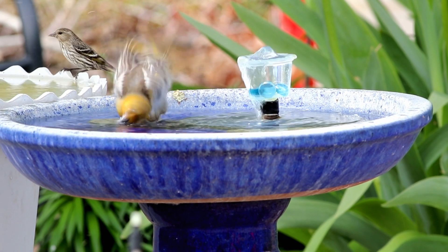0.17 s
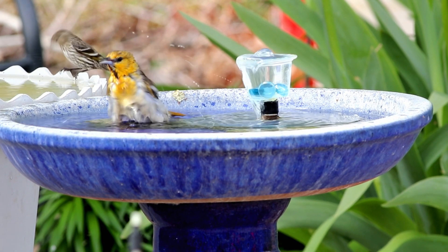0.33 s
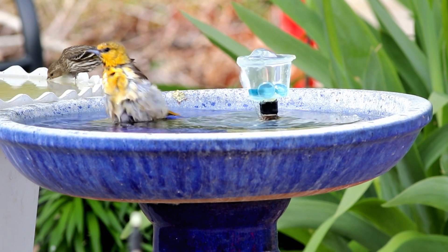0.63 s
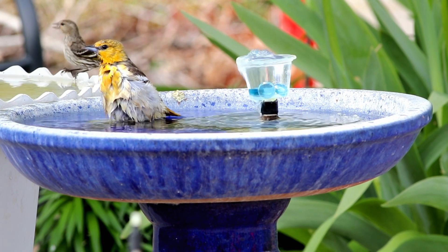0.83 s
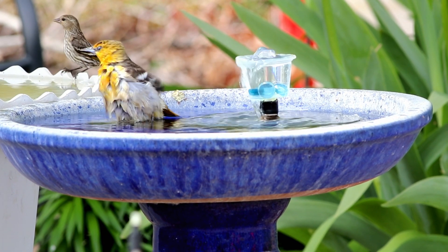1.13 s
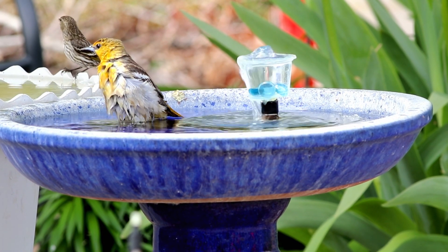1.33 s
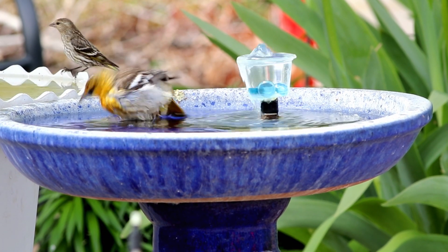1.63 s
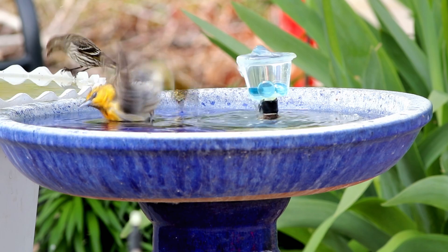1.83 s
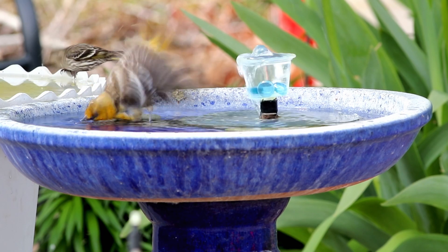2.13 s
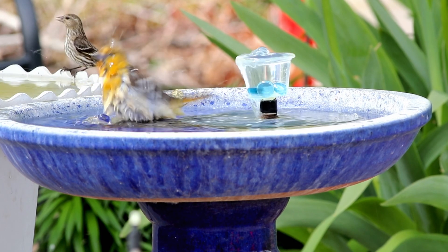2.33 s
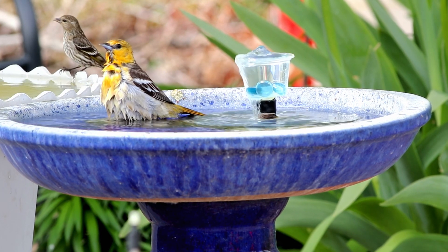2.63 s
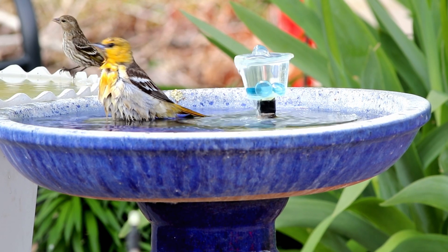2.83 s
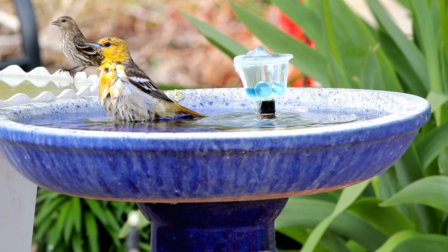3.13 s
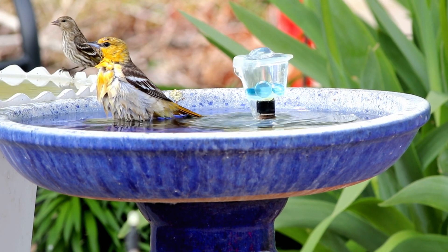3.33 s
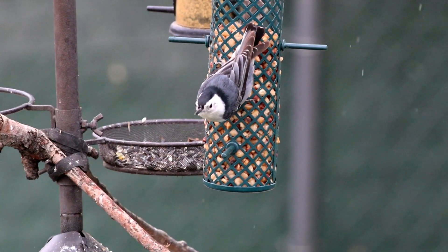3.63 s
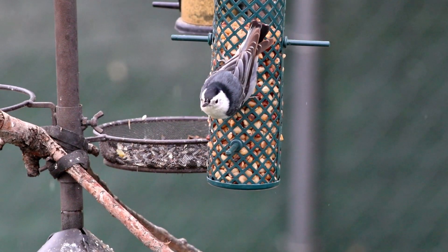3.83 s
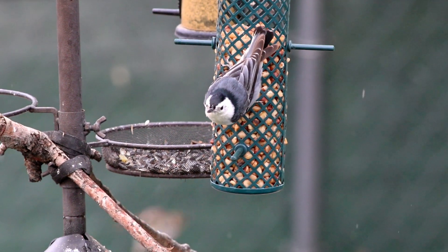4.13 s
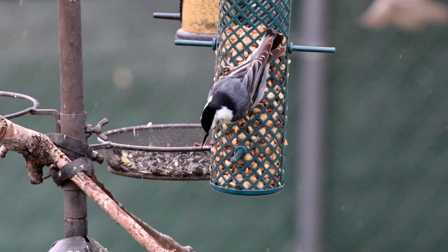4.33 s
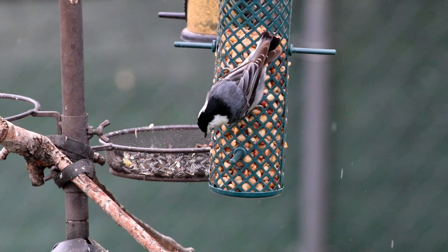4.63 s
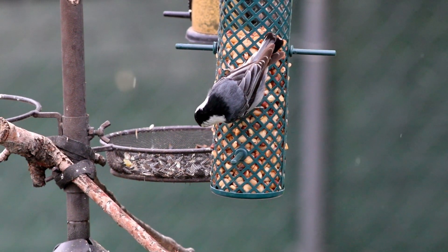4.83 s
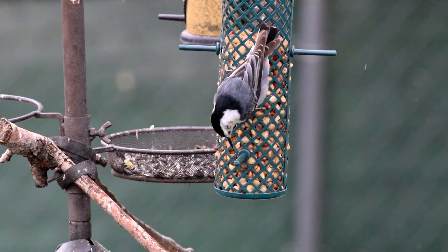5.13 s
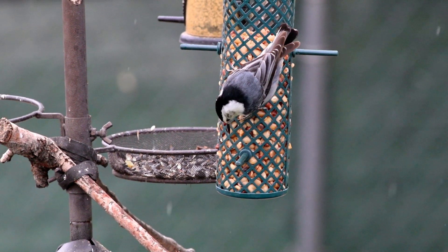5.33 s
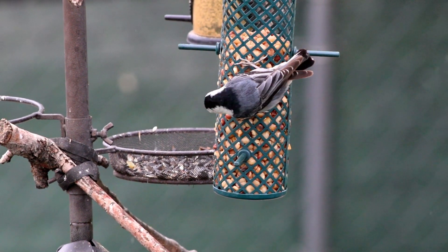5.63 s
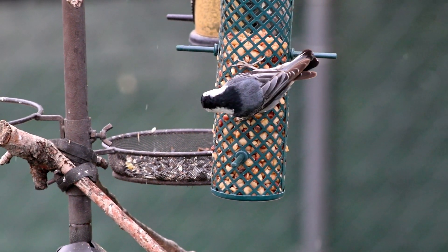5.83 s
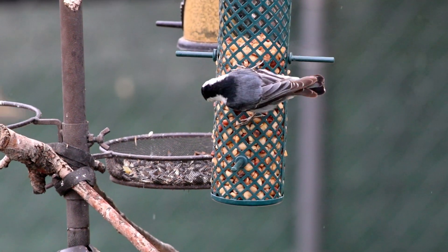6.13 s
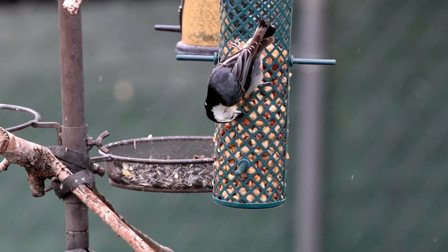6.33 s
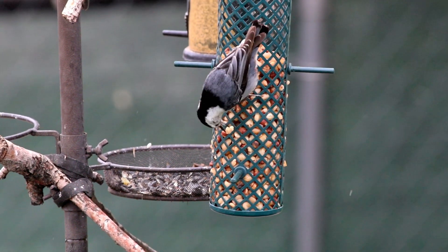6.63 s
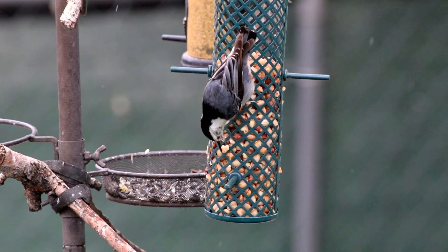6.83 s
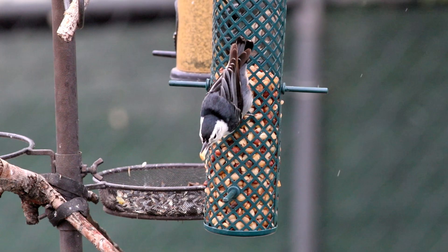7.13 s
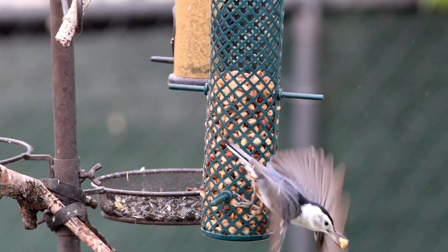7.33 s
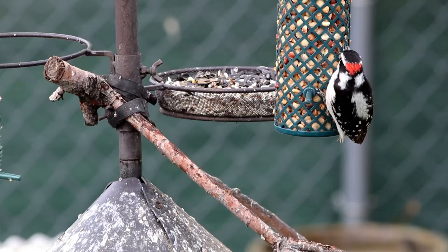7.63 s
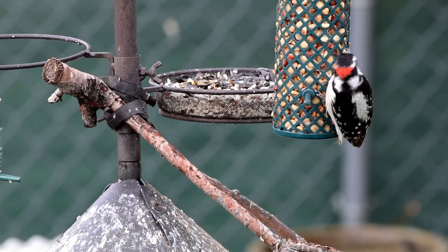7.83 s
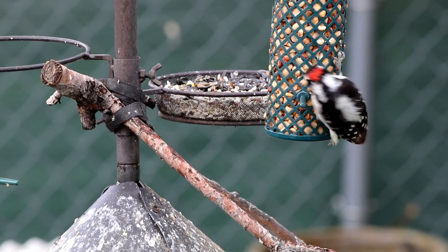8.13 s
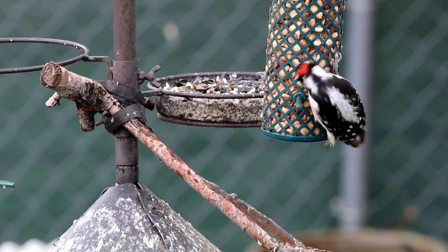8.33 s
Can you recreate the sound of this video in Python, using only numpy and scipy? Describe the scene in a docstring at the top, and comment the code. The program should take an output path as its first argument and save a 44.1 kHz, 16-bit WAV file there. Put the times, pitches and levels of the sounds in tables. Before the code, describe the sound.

Bright overlapping bird chirps and fast trills fill a garden, with faint murmur, dull knocks and low wind thumps at the microphone.

```python
"""A backyard in which a flock of small songbirds twitters, heard through one microphone.
Near birds whistle gliding sines, buzz in pulsed trills, scold and tap in filtered noise; echoes blur the notes.
The far flock sums many random glides; murmur, leaf hiss and wind rumble are coloured noise below it.
Wind bumps the microphone as low tone pulses, and the sound drops out twice for a moment."""
import sys
import numpy as np
from scipy import signal
from scipy.fft import rfft, irfft
from scipy.io import wavfile
from scipy.ndimage import uniform_filter1d

SR = 44100
rng = np.random.default_rng(int(sys.argv[2]) if len(sys.argv) > 2 else 0)


def bounce(signal):
    """Save signal as a 16-bit WAV file at the path given by the first command-line argument."""
    frames = np.transpose(np.atleast_2d(signal))
    limited = np.clip(frames, -1, 1)
    pcm = np.round(limited * 32767).astype(np.int16)
    wavfile.write(sys.argv[1], SR, pcm)


N = 373527


def from_db(db):
    """Level definition: decibels to amplitude gain."""
    return 10 ** (np.asarray(db) / 20)


def rms_one(x):
    """Power normalisation: scales a signal to rms 1."""
    return x / np.sqrt(np.mean(x ** 2) + 1e-20)


def in_time(rows):
    """Linear interpolation: table columns become curves over all samples."""
    seconds, *columns = np.transpose(rows)
    return [np.interp(np.arange(N) / SR, seconds, column) for column in columns]


def coloured(x, points):
    """Spectral shaping: (Hz, dB) points joined over log frequency, -90 dB beyond the ends."""
    hz = np.maximum(np.fft.rfftfreq(N, 1 / SR), 1)
    point_hz, point_db = np.transpose(points)
    shape_db = np.interp(np.log(hz), np.log(point_hz), point_db, -90, -90)
    return irfft(rfft(x) * from_db(shape_db), N)


def drift(rate):
    """Slow random modulation: Gaussian knots, rate per second, joined by lines."""
    knots = rng.standard_normal(1000)
    return np.interp(np.arange(N) / SR * rate, np.arange(len(knots)), knots)


def swells(rows, rise, fall, rest_db):
    """Power addition: rows rise and die away, 20 dB per rise or fall time, over a resting level in dB."""
    t = np.arange(N) / SR
    power = from_db(rest_db) ** 2
    for start, length, level_db in rows:
        outside = np.maximum((start - t) / rise, (t - start - length) / fall)
        power = power + from_db(level_db - 20 * np.maximum(outside, 0)) ** 2
    return 10 * np.log10(power)


NOTE_RISE_S, NOTE_FALL_S = 0.0053, 0.013


def whistle(notes, waver, overtone_db, flutter_hz, rise=NOTE_RISE_S):
    """Frequency modulation: sines glide on parabolas through three pitches, unsteady, with a weak octave."""
    one_pole = [1, -np.exp(-2 * np.pi * flutter_hz / SR)]
    shake = rms_one(signal.lfilter([1], one_pole, rng.standard_normal(N + SR)))
    out = np.zeros(N + SR)
    for start_s, length, start, middle, end, level_db in notes:
        at = max(round(start_s * SR), 0)
        u = np.linspace(-1, 1, round(length * SR))      # -1 at the onset, 1 at the end
        hz = middle + (end - start) / 2 * u + ((start + end) / 2 - middle) * u * u
        rough = waver * min(middle / 4000, 1)      # low whistles are purer
        phase = 2 * np.pi * np.cumsum(hz * (1 + rough * shake[at:at + len(u)])) / SR
        # quick onset, slower end
        swell = np.clip(length / 2 * np.minimum((1 + u) / rise, (1 - u) / NOTE_FALL_S), 0, 1)
        tone = np.sin(phase) + from_db(overtone_db) * np.sin(2 * phase)
        out[at:at + len(u)] += from_db(level_db) * swell * tone
    return out[:N]


def yard(x, scatter_db, t60):
    """Diffuse reverberation: leaves, fences and walls scatter a dying cloud of echoes behind the sound."""
    t = np.arange(SR // 2) / SR
    cloud = rng.standard_normal(len(t)) * from_db(-60 * t / t60)
    cloud = from_db(scatter_db) * cloud / np.sqrt(np.sum(cloud ** 2))
    return x + signal.fftconvolve(x, cloud)[:N]


# Near whistled notes. Each row: start in seconds, length in seconds, start, middle and end pitch in Hz,
# level of the direct sine in dB.
NEAR_NOTES = [(0.001, 0.045, 4290, 4040, 4100, -44), (0.154, 0.053, 3920, 3890, 4100, -46.5),
              (0.174, 0.025, 6430, 6420, 6500, -43), (0.22, 0.029, 4780, 4700, 4640, -41.5),
              (0.244, 0.076, 4000, 3945, 4210, -44), (0.376, 0.045, 1840, 1710, 1600, -51.5),
              (0.382, 0.04, 4500, 4470, 4500, -44.5), (0.398, 0.042, 5260, 4860, 4760, -43),
              (0.455, 0.037, 3160, 3240, 3250, -56), (0.49, 0.068, 3870, 4010, 3760, -47.5),
              (0.745, 0.034, 2870, 2840, 2800, -53), (0.631, 0.019, 2550, 2587, 2650, -41),
              (0.789, 0.04, 4250, 4090, 3780, -42.5), (0.803, 0.031, 2500, 2450, 2470, -54),
              (0.805, 0.071, 5500, 5080, 4520, -47.5), (0.833, 0.047, 2940, 3134, 2910, -44),
              (0.899, 0.048, 4770, 4320, 3700, -42), (0.962, 0.046, 3770, 3740, 3750, -44.5),
              (1.03, 0.029, 3300, 3200, 3180, -45.5), (1.036, 0.1, 4070, 3696, 4070, -47.5),
              (1.076, 0.051, 4530, 4420, 4390, -43), (1.126, 0.033, 2160, 1750, 1620, -47),
              (1.197, 0.061, 6390, 6100, 5460, -44), (1.2, 0.052, 5200, 4960, 4950, -46),
              (1.235, 0.055, 1630, 1920, 2240, -58), (1.278, 0.032, 2240, 2414, 2500, -37.5),
              (1.325, 0.074, 6770, 6250, 6040, -48), (1.33, 0.08, 5350, 5100, 5000, -49),
              (1.335, 0.056, 3850, 4090, 4470, -46.5), (1.447, 0.073, 3550, 3890, 3870, -45),
              (1.468, 0.055, 6800, 6350, 6050, -47), (1.483, 0.022, 5400, 5510, 5640, -39),
              (1.485, 0.093, 2700, 3060, 3260, -50.5), (1.531, 0.034, 2570, 2620, 2620, -48.5),
              (1.597, 0.085, 2900, 2860, 2660, -49.5), (1.603, 0.068, 4430, 4560, 4550, -42.5),
              (1.611, 0.099, 5790, 5740, 6020, -48), (1.643, 0.11, 4170, 3800, 3780, -42.5),
              (1.681, 0.065, 4390, 4220, 4350, -44.5), (1.693, 0.079, 6770, 5900, 5530, -45),
              (1.745, 0.055, 6310, 6600, 6540, -47), (1.86, 0.049, 5470, 5580, 5700, -45.5),
              (1.73, 0.046, 2530, 2610, 2770, -56), (1.962, 0.065, 7600, 7370, 7470, -42),
              (1.984, 0.072, 7860, 7930, 7900, -47.5), (1.986, 0.052, 4550, 4450, 4600, -51),
              (2.002, 0.037, 5450, 5370, 5250, -44), (2.016, 0.028, 4080, 4190, 4140, -39),
              (2.064, 0.066, 4170, 3870, 4200, -41), (2.086, 0.057, 5140, 4960, 4940, -40),
              (2.175, 0.037, 4330, 4460, 4630, -54.5), (2.398, 0.028, 6600, 6220, 6300, -42),
              (2.397, 0.029, 7280, 7350, 7160, -44.5), (2.405, 0.026, 7230, 8040, 9500, -46),
              (2.405, 0.056, 3710, 4630, 4340, -37.5), (2.431, 0.1, 5080, 5600, 5510, -48.0),
              (2.475, 0.068, 4370, 4760, 4750, -43.5), (2.509, 0.061, 3590, 3800, 3930, -51),
              (2.527, 0.037, 3070, 3120, 3310, -53), (2.8, 0.21, 4830, 4910, 4820, -60.5),
              (3.004, 0.046, 4000, 4130, 3530, -42.5), (3.04, 0.039, 8200, 7500, 6960, -51),
              (3.086, 0.035, 5310, 5340, 5180, -47.5), (3.106, 0.035, 5000, 4460, 4230, -41.5),
              (3.232, 0.052, 4950, 4240, 3530, -41.5), (3.315, 0.029, 5100, 5560, 5900, -43),
              (3.33, 0.051, 5000, 4390, 3860, -47), (3.435, 0.026, 7200, 7300, 7300, -51.5),
              (3.437, 0.043, 4610, 4440, 4340, -44.5), (3.521, 0.025, 6040, 5680, 5600, -43.5),
              (3.604, 0.063, 6440, 6000, 6150, -51), (3.542, 0.046, 4960, 4730, 4300, -52.5),
              (3.652, 0.047, 6260, 6100, 6060, -52), (3.72, 0.061, 5220, 5020, 5040, -54),
              (3.89, 0.035, 5770, 5740, 5600, -44), (3.94, 0.069, 5170, 4560, 3820, -47),
              (4.25, 0.069, 3970, 3970, 4170, -53.5), (4.53, 0.033, 4100, 4640, 5260, -48),
              (4.685, 0.044, 4810, 4080, 3450, -45.5), (4.724, 0.078, 7000, 6670, 6200, -54),
              (4.75, 0.095, 4390, 3540, 3340, -53.5), (4.888, 0.053, 3970, 4600, 4700, -47.5),
              (4.985, 0.065, 6080, 6270, 6250, -48), (4.998, 0.034, 5000, 4420, 3880, -39.5),
              (5.115, 0.038, 4780, 3940, 3480, -42.5), (5.125, 0.04, 2850, 3140, 3270, -42.5),
              (5.18, 0.062, 2430, 2620, 3250, -56.5), (5.185, 0.033, 4080, 3660, 3600, -46),
              (5.287, 0.031, 4020, 4400, 4360, -49), (5.42, 0.055, 5020, 4290, 3960, -43.0),
              (5.426, 0.15, 2510, 2270, 1980, -53.5), (5.452, 0.037, 6500, 5370, 4760, -43.5),
              (5.514, 0.037, 5500, 5640, 5050, -43.5), (5.54, 0.074, 4770, 3970, 3780, -45),
              (5.565, 0.12, 2180, 2985, 2780, -58), (5.678, 0.02, 4140, 4110, 3960, -42),
              (5.779, 0.045, 6830, 5600, 5300, -50.5), (5.855, 0.03, 5900, 5820, 5830, -42.5),
              (5.87, 0.049, 5700, 4310, 3450, -46.5), (5.999, 0.035, 5660, 5540, 5650, -51),
              (6.003, 0.016, 11500, 9500, 7000, -51), (6.061, 0.046, 6150, 6280, 6260, -48),
              (6.071, 0.047, 6730, 7270, 7200, -54), (6.107, 0.079, 4640, 4340, 3720, -45),
              (6.13, 0.037, 10600, 10570, 11100, -59), (6.163, 0.024, 8040, 7870, 7500, -49),
              (6.183, 0.099, 3730, 4340, 3920, -43.5), (6.191, 0.041, 5660, 5480, 5470, -50),
              (6.207, 0.028, 8000, 7960, 7700, -46), (6.207, 0.034, 7200, 7400, 7260, -49),
              (6.378, 0.068, 4400, 4430, 4560, -45), (6.426, 0.067, 3760, 3940, 4210, -40.5),
              (6.468, 0.048, 5120, 5240, 5000, -42.5), (6.504, 0.033, 5740, 5850, 6100, -43),
              (6.614, 0.024, 5770, 5950, 5830, -44), (6.616, 0.032, 5400, 5300, 5320, -45.5),
              (6.701, 0.035, 5300, 5280, 5330, -44.5), (6.707, 0.045, 4090, 4080, 3970, -47),
              (6.735, 0.065, 6100, 6240, 6450, -46.5), (6.771, 0.031, 3140, 3140, 3160, -50),
              (7.83, .03, 7200, 7150, 7100, -48.5), (6.93, 0.025, 10900, 10850, 10800, -61),
              (6.969, 0.057, 6370, 6200, 6400, -47), (6.997, 0.085, 5720, 6170, 5940, -45.5),
              (7.039, 0.036, 5500, 5400, 5230, -43.5), (7.218, 0.068, 4770, 4780, 4840, -46.5),
              (7.416, 0.043, 3720, 3720, 3920, -46.5), (7.422, 0.087, 4260, 4320, 3580, -46),
              (7.426, 0.025, 6130, 6200, 6300, -48), (7.456, 0.051, 5940, 5800, 5820, -46),
              (7.486, 0.06, 4720, 4570, 4360, -44), (7.541, 0.062, 3840, 4150, 4220, -44.5),
              (7.683, 0.029, 4730, 4890, 4720, -43.5), (7.863, 0.074, 4130, 3896, 4130, -44.5),
              (7.937, 0.025, 4350, 3980, 3570, -44), (8.024, 0.089, 8330, 8500, 8900, -52.5),
              (8.03, 0.13, 4510, 5180, 5420, -49), (8.04, 0.055, 7120, 7140, 7430, -46.5),
              (8.08, 0.086, 3730, 4110, 4300, -49), (8.14, 0.16, 5320, 5450, 5670, -53),
              (8.28, 0.092, 4400, 4400, 4450, -48.5), (8.2, 0.16, 2760, 2810, 3080, -66.5),
              (8.3, 0.12, 5730, 6200, 7570, -52), (8.308, 0.037, 7330, 7500, 7500, -49.5),
              (8.318, 0.06, 7930, 8200, 8340, -50.5), (8.372, 0.08, 4450, 4560, 4820, -44)]


def near_notes():
    """Near-sinusoidal voicing: short whistled glides with a faint octave."""
    return whistle(NEAR_NOTES, waver=.024, overtone_db=-32.0, flutter_hz=450.0)


# Long buzzing trills. Each row: start in seconds, length in seconds, start, middle and end pitch in Hz,
# level in dB before the pulsing.
BUZZ_TRILLS = [(1.52, 0.59, 7300, 7000, 7700, -52), (2.78, 0.51, 7400, 7200, 11000, -61.5),
               (4.23, .65, 8000, 7600, 7400, -56), (7.23, 0.13, 5000, 3600, 4500, -42),
               (0.086, 0.47, 7800, 7500, 5400, -55.5)]
BUZZ_PER_S, BUZZ_RISE_S = 135, 0.066      # mean pulse rate, swell time


def buzzes():
    """Amplitude modulation: a rough, slowly swelling whistle in fast, slightly uneven pulses."""
    pulse = np.cos(2 * np.pi * np.cumsum(BUZZ_PER_S * (1 + .1 * drift(30.0))) / SR)
    slow = whistle(BUZZ_TRILLS, waver=.07, overtone_db=-50.0, flutter_hz=900.0, rise=BUZZ_RISE_S)
    return slow * (1 + .6 * pulse)


def flock(level_db, low_hz, high_hz, waver, blur_db, count):
    """Superposition: many random glides overlap, are held even, then follow the loudness of these voices."""
    when, length, pitch, glide, loud = rng.random((count, 5)).T
    place = np.sqrt(pitch * rng.random(count) + .25 * pitch)      # sparse at the bottom of the range
    middle = low_hz * (high_hz / low_hz) ** place
    half = .25 * middle * (.75 - glide)      # most notes fall, and steeply
    notes = zip(when * N / SR, .015 + .04 * length, middle + half, middle, middle - .6 * half, 8 * loud)
    calls = rms_one(yard(whistle(notes, waver, -38.0, 410.0), 2.1, 0.12))
    reach = [(0.73 * low_hz, -25), (low_hz, 0), (high_hz, 0), (1.28 * high_hz, -25)]
    # the farthest birds merge into hiss
    voices = calls + from_db(blur_db) * rms_one(coloured(rng.standard_normal(N), reach))
    running_rms = np.sqrt(uniform_filter1d(voices ** 2, size=3000) + 1e-20)
    return from_db(level_db) * voices / running_rms


# Bouts of far twittering with hushes between. Each row: start in seconds, length in seconds,
# level in dB before the trim of the main voices.
FLOCK_BOUTS = [(0, 0.046, -41), (.17, 0.34, -44.5), (.59, 0.085, -42), (.76, 0.15, -41),
               (1.0, 0.093, -41.5), (1.2, 0.075, -43), (1.335, 0.059, -42), (1.475, 0.61, -42),
               (2.18, 0.015, -58), (2.28, 0.014, -58.5), (2.41, 0.14, -48), (2.62, 0.15, -58.5),
               (2.8, 0.25, -58.5), (3.0, 0.35, -50.5), (3.445, 0.03, -51), (3.545, 0.24, -52.5),
               (3.88, 0.14, -50.5), (4.12, 0.11, -52.5), (4.27, 0.65, -48), (4.98, 0.508, -46),
               (5.58, 0.071, -51), (5.72, 0.15, -44), (6.01, 0.82, -44.5), (6.95, 0.22, -44.5),
               (7.21, 0.11, -48.5), (7.39, 0.32, -49), (7.8, 0.13, -49.5), (7.97, 0.27, -46.5),
               (8.29, 0.2, -50.5)]
BOUT_RISE_S, BOUT_FALL_S, HUSH_DB = 0.072, 0.099, -67      # times are for 20 dB
# Which voices lead. Each row: time in seconds, middle voices in dB, high voices in dB,
# both against the whole flock.
LEADING_VOICES = [(0, -7.5, -10.5), (1.3, -6, -14), (1.8, -3.5, -16.5), (2.1, -12, -8.5), (2.9, -3, -5),
                  (3.3, -4, -13.5), (3.7, -10.5, -14.5), (4.3, -6, -3), (4.8, -5, -12), (5.1, -12.5, -16.5),
                  (5.8, -7, -14.5), (6.05, -6, -2.5), (6.5, -8, -12), (7.05, -3, -12), (7.3, -12, -9.5),
                  (7.55, -3, -18.5), (8.05, -7, -3.5), (8.47, -3, -11.5)]
DEEP_VOICES_DB, TRIM_DB = -21.5, -1.5      # deep voices against the bouts; trim of the other three


def far_flock():
    """Band energy balance: low, middle and high voices share the flock's power, over a few deeper ones."""
    bouts_db = swells(FLOCK_BOUTS, BOUT_RISE_S, BOUT_FALL_S, HUSH_DB)
    middle_db, high_db = in_time(LEADING_VOICES)
    # the low voices fill the rest
    low_db = 10 * np.log10(np.maximum(1 - from_db(middle_db) ** 2 - from_db(high_db) ** 2, .1))
    main_db = bouts_db + TRIM_DB
    low = flock(main_db + low_db, 3500, 4900, waver=.015, blur_db=-10.0, count=720)
    middle = flock(main_db + middle_db, 5000, 6600, waver=.014, blur_db=-9.0, count=720)
    high = flock(main_db + high_db, 6500, 8700, waver=.014, blur_db=-7.5, count=950)
    deep = flock(bouts_db + DEEP_VOICES_DB, 2400, 3600, waver=.035, blur_db=-10.0, count=130)
    return low + middle + high + deep


def bursts(rows, low_hz, high_hz, rise, fall):
    """Band-limited noise: each burst rises and falls in straight lines, in seconds."""
    t = np.arange(N) / SR
    swell = np.zeros(N)
    for start, peak_db in rows:
        ramp = np.minimum((t - start) / rise, 1 + (start + rise - t) / fall)
        swell += from_db(peak_db) * np.clip(ramp, 0, 1)
    band = signal.butter(2, [low_hz, high_hz], "band", fs=SR, output="sos")
    return swell * rms_one(signal.sosfilt(band, rng.standard_normal(N)))


# Harsh scolding bursts. Each row: start in seconds, peak of the swell in dB.
SCOLD_BURSTS = [(4.336, -48), (4.3974, -47.5), (4.4702, -57), (4.522, -50), (4.6, -66), (4.682, -58.5)]


def scolding():
    """Noise excitation: harsh calls without clear pitch, in one band."""
    return bursts(SCOLD_BURSTS, 2400, 3700, rise=0.006, fall=0.02)


# Beak taps on the feeder. Each row: start in seconds, peak of the swell in dB.
BEAK_TAPS = [(8.0027, -63), (8.159, -53), (8.2045, -54.5)]


def beak_taps():
    """Impact sound: an abrupt onset and short decay in a narrow band."""
    return bursts(BEAK_TAPS, 1600, 2100, rise=0.0014, fall=0.017)


# Faint dull knocks nearby. Each row: start in seconds, peak of the swell in dB.
DULL_KNOCKS = [(.647, -53), (1.375, -54), (4.015, -53), (5.41, -55.5), (5.823, -58), (5.89, -54.5),
               (6.17, -53.5), (6.928, -55), (7.063, -54), (7.18, -59), (7.273, -57)]


def knocks():
    """Impact sound: a lower band and longer decay make the knock dull."""
    return bursts(DULL_KNOCKS, 565, 1270, rise=0.00063, fall=0.039)


def wavelets(rows, rough_db, rough_hz):
    """Gaussian tone pulses: each bell-shaped swell has a chance phase and a puff of turbulence."""
    t, out = np.arange(N) / SR, np.zeros(N)
    puff_shape = [(0.52 * rough_hz, -10), (rough_hz, 0), (4.38 * rough_hz, -35)]
    puff = from_db(rough_db) * rms_one(coloured(rng.standard_normal(N), puff_shape))
    for (centre, width, hz, peak_db), turn in zip(rows, rng.random(len(rows))):
        near = slice(round((centre - .2) * SR), round((centre + .2) * SR))
        since = t[near] - centre
        swell = from_db(peak_db) * np.exp(-(since / (1.08 * width)) ** 2)
        out[near] += swell * (np.cos(2 * np.pi * (hz * since + turn)) + puff[near])
    return out


# Wind bumps on the microphone. Each row: centre in seconds, nominal width in seconds,
# peak of the swell in dB.
WIND_BUMPS = [(1.928, 0.0087, -23), (1.975, 0.045, -31.5), (2.035, 0.034, -26), (2.068, 0.027, -24.5),
              (2.106, 0.014, -20), (3.901, 0.026, -28), (4.149, 0.015, -26), (4.351, 0.036, -45.5),
              (4.996, 0.016, -27.5), (5.042, 0.012, -17.5), (5.071, 0.01, -23.5), (5.134, 0.016, -18),
              (5.295, 0.012, -26.5), (5.521, 0.017, -32), (5.579, 0.0068, -27.5), (5.855, 0.013, -29),
              (5.896, 0.016, -17), (5.93, 0.0062, -24.5), (5.959, 0.017, -27), (6.328, 0.031, -29),
              (7.522, 0.024, -36), (7.648, 0.022, -45), (8.009, 0.022, -39)]
BUMP_HZ, BUMP_CYCLES_PER_WIDTH = 33.4, 0.26      # a narrow bump is higher in pitch


def bumps():
    """Time-frequency reciprocity: each low pulse takes its pitch from its width."""
    rows = [(centre, width, BUMP_HZ + BUMP_CYCLES_PER_WIDTH / width, peak_db)
            for centre, width, peak_db in WIND_BUMPS]
    return wavelets(rows, rough_db=-15.5, rough_hz=95.0)


# Brief hollow hoots. Each row: centre in seconds, nominal width in seconds, pitch in Hz,
# peak of the swell in dB.
HOLLOW_HOOTS = [(2.05, .03, 237, -44), (8.25, .015, 345, -42), (8.305, .022, 348, -31),
                (8.37, .015, 330, -46)]


def hoots():
    """Tone with turbulence: brief steady pitches, perhaps wind across an opening."""
    return wavelets(HOLLOW_HOOTS, rough_db=-10.0, rough_hz=277.0)


# Gusts that raise the rumble. Each row: start in seconds, length in seconds, rumble in dB before drift.
WIND_GUSTS = [(3.6, 0.072, -52), (4.95, 0.85, -46.5), (6.33, 0.2, -47.5), (7.9, 0.57, -48.5)]
GUST_RISE_S, GUST_FALL_S, CALM_DB = 0.029, 0.064, -61.5      # times are for 20 dB


def rumble():
    """Low-frequency turbulence: lumpy wind noise on the microphone, raised by gusts."""
    level_db = swells(WIND_GUSTS, GUST_RISE_S, GUST_FALL_S, CALM_DB)
    shape = [(15, -19.5), (40, -8), (65, -5.5), (110, -15.0), (200, -36.0)]
    noise = rms_one(coloured(rng.standard_normal(N), shape))
    return noise * from_db(level_db + 3.5 * drift(15.0))


# Background levels in three stretches. Each row: time in seconds, murmur in dB, hiss in dB,
# both before drift.
AIR_LEVELS = [
    [(0.0, -56.5, -73), (2.13, -54, -72)],
    [(2.16, -61, -82), (6.0, -60.5, -75), (7.36, -57, -75.5)],
    [(7.4, -61, -82), (8.294, -61.5, -76), (8.47, -62.5, -78)],
]
# Murmur spectrum, of which only the shape counts. Each row: frequency in Hz, density in dB per Hz.
MURMUR_SPECTRUM = [(90, -29), (112, 6.5), (121, 12), (132, -0.5), (230, 3.5), (450, -5.5), (750, -4.5),
                   (1500, -8), (2100, -17.5), (4000, -38), (9000, -50)]


def air():
    """Coloured noise: distant air and traffic murmur under a thin hiss of leaves, both drifting in level."""
    murmur_db, hiss_db = in_time(sum(AIR_LEVELS, []))
    murmur = rms_one(coloured(rng.standard_normal(N), MURMUR_SPECTRUM))
    hiss = rms_one(coloured(rng.standard_normal(N), [(5000, 2.7), (10000, 15.0), (17000, 9.2)]))
    return murmur * from_db(murmur_db + 1.7 * drift(18.0)) + hiss * from_db(hiss_db + 0.53 * drift(28.0))


def scene():
    """Linear superposition: all sources add to one signal on both channels."""
    near = yard(near_notes() + buzzes(), scatter_db=-0.5, t60=.13)
    touches = scolding() + beak_taps() + knocks()
    wind = bumps() + hoots() + rumble()
    mono = near + far_flock() + touches + wind + air()
    return np.array([mono, mono])


# Dropouts. Each row: start in seconds, stop in seconds.
SILENT_GAPS = [(2.1355, 2.1575), (7.3685, 7.3915)]
CUTOFF_HZ = 15750


def record(dry):
    """Gating and low-pass filtering: two short dropouts with quick edges, then the top is cut."""
    t, gate = np.arange(N) / SR, np.ones(N)
    for start, stop in SILENT_GAPS:
        # closes over 3 ms, reopens over 0.5 ms
        gate *= np.clip(np.maximum((start - t) / .003, (t - stop) / .0005), .002, 1)
    low_pass = signal.ellip(12, .5, 70, CUTOFF_HZ, fs=SR, output="sos")
    return signal.sosfilt(low_pass, dry * gate)


dry = scene()
out = record(dry)
bounce(out)
```